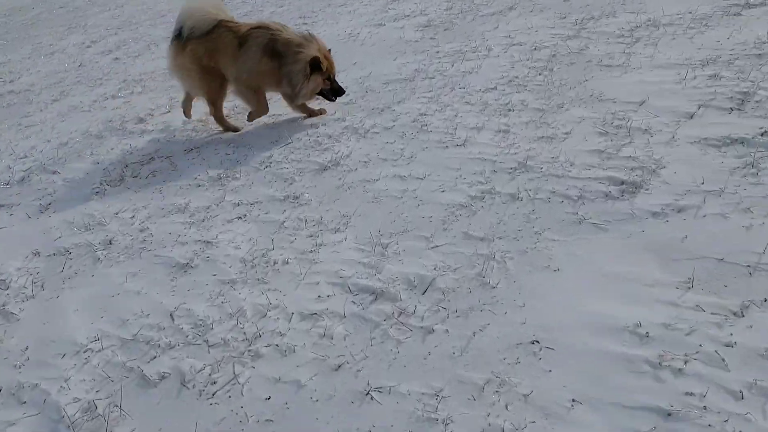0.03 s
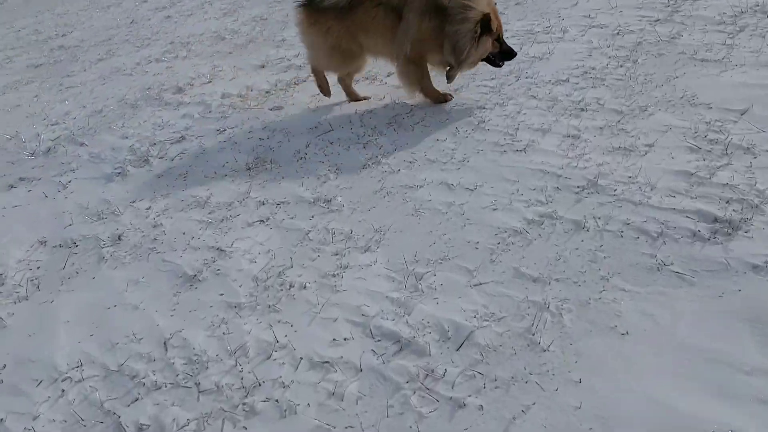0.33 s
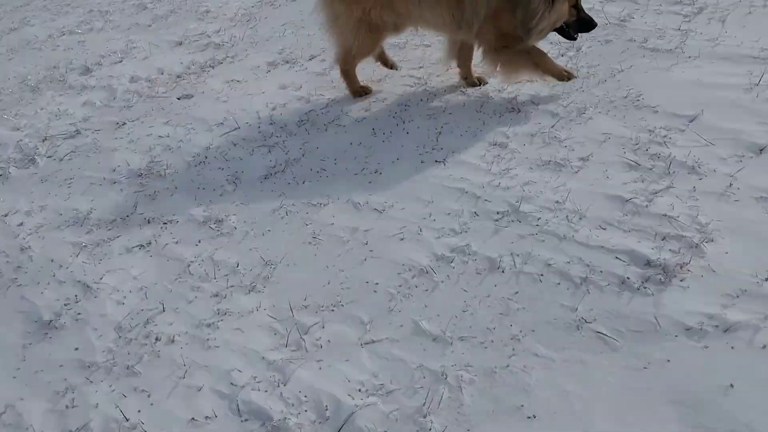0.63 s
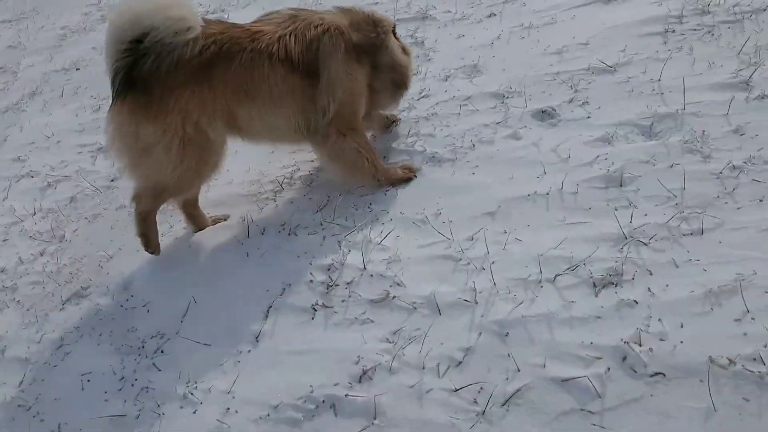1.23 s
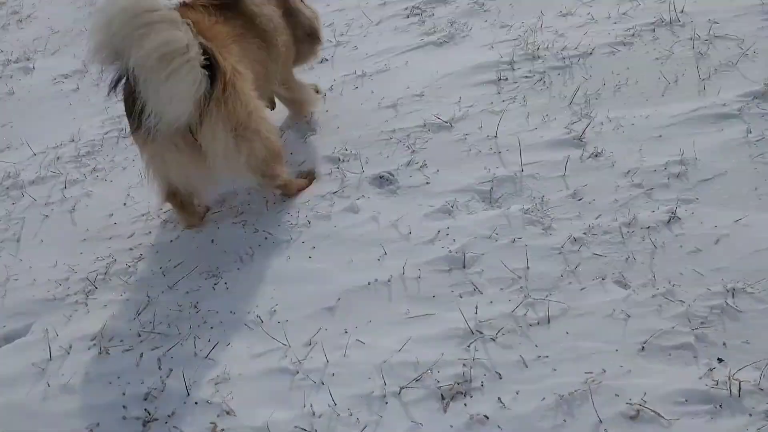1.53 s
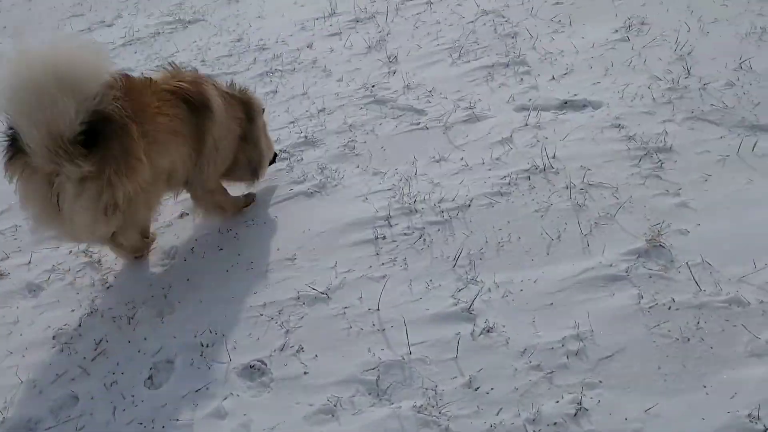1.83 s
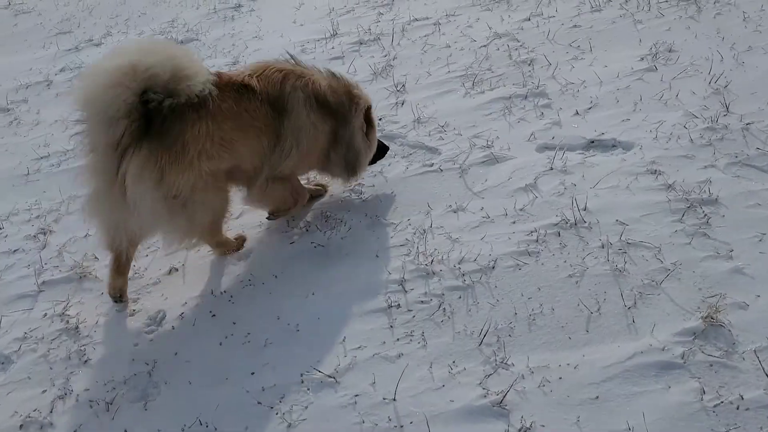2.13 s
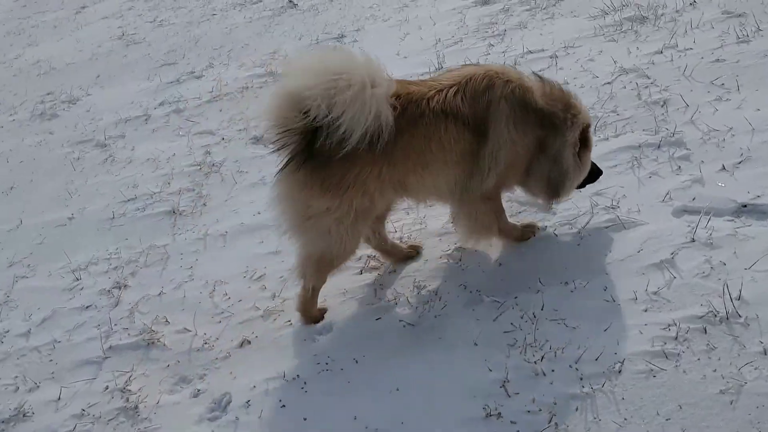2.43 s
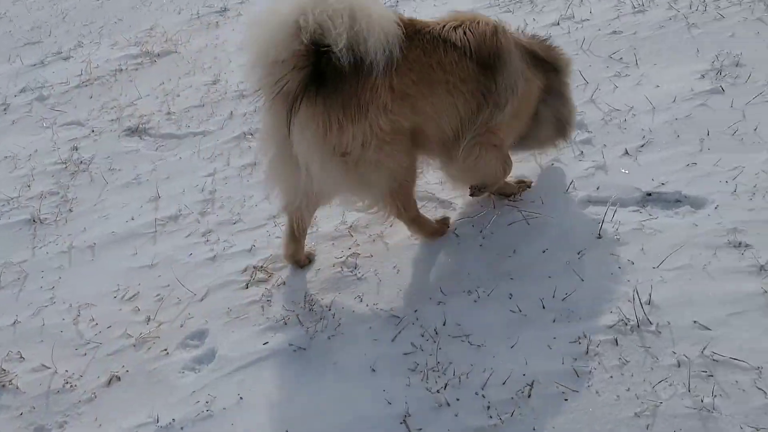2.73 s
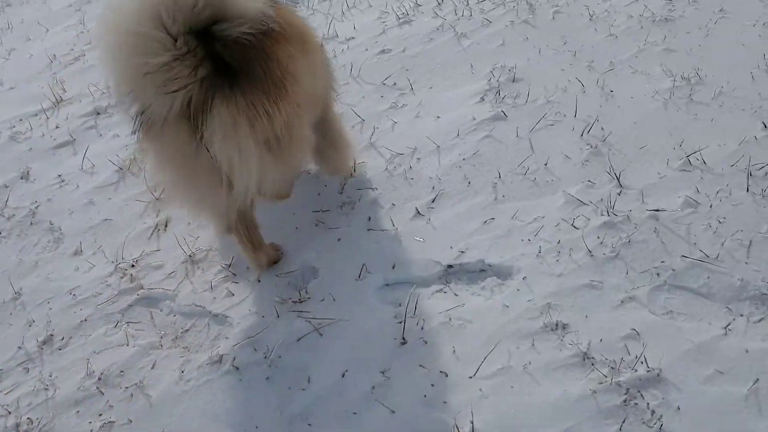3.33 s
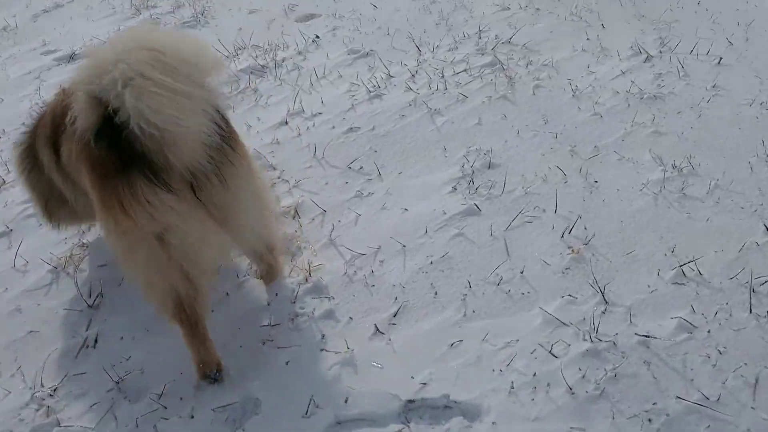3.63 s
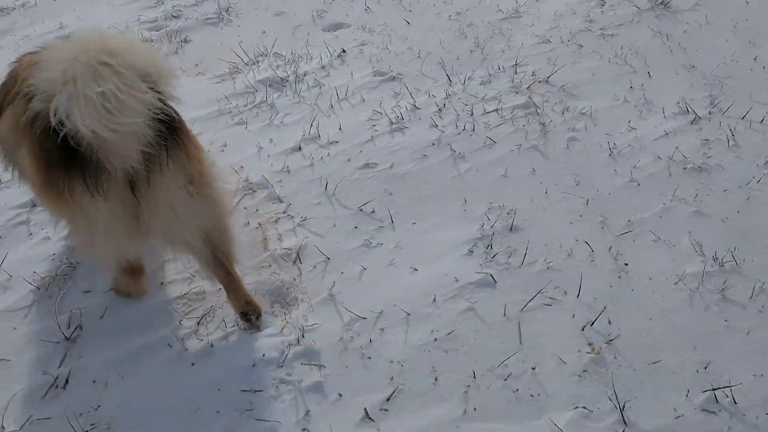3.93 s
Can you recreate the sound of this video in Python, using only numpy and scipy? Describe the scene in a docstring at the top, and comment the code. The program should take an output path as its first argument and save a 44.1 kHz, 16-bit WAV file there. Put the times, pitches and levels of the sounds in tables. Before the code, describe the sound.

Footsteps crunch steadily through thin, dry, crusted snow in an open field. Each close boot step cracks and scuffs the crust, with small hollow knocks and icy ticks, while light wind briefly rumbles on the microphone early on.

```python
"""An open field of thin, dry, crusted snow. Boots walk close by, a step about every 0.6 s.
Each sole crushes and scuffs the crust in runs of tiny fractures. Single plates of crust break with
a hollow knock, and loose ice ticks. Loose grains hiss between the steps, and a light wind
buffets the microphone."""
import sys
import numpy as np
from scipy import signal
from scipy.io import wavfile
from scipy.ndimage import uniform_filter1d

SR = 44100
rng = np.random.default_rng(int(sys.argv[2]) if len(sys.argv) > 2 else 0)


def unload_audio(sound):
    """Save the sound as a 16-bit wav file, at the path given as the first command line argument."""
    columns = np.transpose(np.atleast_2d(sound))
    # keep every value between -1 and 1, then stretch to whole-number steps
    steps = np.round(np.clip(columns, -1, 1) * 32767)
    wavfile.write(sys.argv[1], SR, steps.astype(np.int16))


N = 176400

# Four tone colours of snow. Each row: frequency in Hz, relative level in dB.
PACKING_TONE = [(40, -33), (90, -30), (140, -4.5), (220, 0.5), (400, 3), (520, -7), (800, -26.5),
                (2000, -55)]  # snow pressed down under the crust
CRUNCH_TONE = [(100, -38), (300, -19), (500, 1.5), (750, 0.5), (1100, -3), (1500, -4.5), (2000, -12),
               (2500, -22), (3200, -19), (4200, -26), (6000, -41), (16000, -75.5)]  # the crust breaking
RASP_TONE = [(800, -19.5), (2000, 7), (3100, 1.5), (4200, -3.5), (5500, -0.5), (7500, -17), (16000, -31.5)]  # the sole scuffing
FIZZ_TONE = [(300, -53), (1500, -19), (3000, 7), (4500, 1), (7000, 2.5), (10000, 0), (13000, -2.5),
             (15800, 1)]  # fine ice crystals

CRYSTALS_PER_S, CRYSTAL_SPREAD_DB = 4500, 5


def amp(db):
    """Turns decibels into a number to multiply by."""
    return 10 ** (np.asarray(db) / 20)


def unit(x):
    """Scales a signal to an average power of 1."""
    return x / np.sqrt(np.mean(x ** 2) + 1e-20)


def spectrum_db(points):
    """Joins rows of frequency and dB into a curve for a filter."""
    hz, db = np.transpose(points)
    return np.interp(np.log(np.fft.rfftfreq(4096, 1 / SR) + 1), np.log(hz), db)


def level(points):
    """Joins rows of time and dB into a gain for every sample."""
    return amp(np.interp(np.arange(N) / SR, *np.transpose(points)))


def shape(x, gain):
    """Turns each frequency up or down, with no ringing ahead of a click."""
    log_gain = np.log(np.r_[gain, gain[-2:0:-1]] + 1e-6)
    response = np.exp(np.conj(signal.hilbert(log_gain)))
    taps = np.fft.ifft(response).real[:len(gain)]
    return signal.oaconvolve(np.atleast_2d(x), taps[None], axes=1)[:, :N]


def colour(x, tone):
    """Gives plain noise or clicks a tone colour and keeps their power."""
    return shape(x, unit(amp(spectrum_db(tone))))


def add(mix, start_s, sound):
    """Mixes a sound in at the given time."""
    at = max(round(start_s * SR), 0)
    part = mix[..., at:at + sound.shape[-1]]
    part += sound[..., :part.shape[-1]]


def wander(step_s):
    """A curve that slides to a new random value every step_s seconds."""
    values = rng.standard_normal(4096)
    return np.interp(np.arange(N) / SR / step_s, np.arange(len(values)), values)


def grains(per_s, spread_db):
    """Uneven clicks from random directions. The two rows are mid (centre) and side (left minus right)."""
    size_db = spread_db * np.minimum(rng.exponential(1, N), 3.5)
    clump_db = 3 * wander(step_s=.004)  # fractures come in small avalanches
    happens = rng.random(N) < per_s / SR
    clicks = amp(size_db + clump_db) * happens * rng.choice([-1., 1.], N)
    return np.array([unit(clicks), unit(clicks * rng.standard_normal(N))])


def cut(clicks, start_s, t):
    """Takes a stretch of clicks as long as t, at an average power of 1."""
    return unit(np.take(clicks, round(start_s * SR) + np.arange(len(t)), axis=1, mode="wrap"))


def burst(clicks, start_s, decay_s):
    """A spray of clicks that dies away quickly."""
    t = np.arange(0, 6 * decay_s, 1 / SR)
    fade = np.exp(-t / decay_s)
    return unit(cut(clicks, start_s, t) * fade) * np.sqrt(np.mean(fade ** 2))


def wind():
    """Gusts rumble on the microphone and push left and right in opposite directions."""
    # Strength of the wind. Each row: time in seconds, relative level in dB.
    gusts = [(0, -38), (.2, -30.5), (.37, -40.5), (.5, -24), (.65, -18), (.78, -18.5), (.9, -16.5),
             (1.03, -21), (1.15, -34.5), (1.35, -28.5), (1.6, -31), (1.7, -40), (1.85, -33), (2.1, -47),
             (2.4, -43), (2.7, -33), (3.3, -52), (4, -44)]
    # Tone of the rumble. Each row: frequency in Hz, relative level in dB.
    rumble_tone = [(20, -19), (50, -7), (80, 1), (110, 1.5), (170, 1), (260, -12), (400, -20.5), (700, -40),
                   (1500, -68), (4000, -85)]
    air, stray_air = colour(rng.standard_normal((2, N)), rumble_tone)
    strength = level(gusts) * amp(-3 + wander(step_s=.03))
    return strength * (np.array([air, -amp(-1.5) * air]) + amp(-13.5) * stray_air)


def loose_grains():
    """Loose grains of snow shift and hiss between the steps."""
    # Coarse rustle and fine hiss. Each row: time in seconds, relative level in dB.
    rustle_levels = [(0, -34.5), (.39, -51.5), (.6, -39), (1.05, -56), (1.4, -45), (1.49, -49), (1.7, -35),
                     (1.845, -50.5), (1.98, -48.5), (2.12, -50), (2.3, -44), (2.6, -46), (2.8, -45),
                     (3.1, -41), (3.46, -48), (3.7, -41), (3.81, -55), (4, -48)]
    hiss_levels = [(0, -41), (.27, -48), (.39, -57.5), (.51, -53), (.6, -40.5), (.76, -50), (1.2, -47),
                   (1.49, -50), (1.7, -40), (1.845, -58), (2.12, -55.5), (2.3, -43.5), (2.42, -40.5),
                   (2.56, -46), (3.2, -42), (3.46, -48.5), (3.7, -45), (3.81, -59), (4, -48.5)]
    coarse = grains(per_s=2600, spread_db=3) * level(rustle_levels)
    fine = grains(per_s=14000, spread_db=4) * level(hiss_levels)
    rustle = amp(2) * colour(coarse, CRUNCH_TONE) + amp(-3.5) * colour(coarse, PACKING_TONE)
    return rustle + amp(1) * colour(fine, FIZZ_TONE)


def ice_ticks():
    """Thin ice snaps with a bright tick and a lower click."""
    # Each row is one snap: start in seconds, then relative levels in dB of the tick and the click.
    snaps = [(.088, -17, -22), (.196, -57, -42), (.265, -33, -35), (0.624, -28, -25), (.729, -34.5, -50),
             (0.792, -35, -28), (.803, -23, -22.5), (0.833, -37, -43), (0.907, -39, -47), (0.919, -24, -32),
             (0.947, -22.5, -24), (.965, -28, -36), (1.028, -34, -23), (1.038, -23, -14.5),
             (1.302, -29.5, -37), (1.413, -34, -34), (1.44, -31, -40), (1.451, -24.5, -27.5),
             (1.529, -30, -27), (1.559, -28, -28), (1.606, -27, -32), (1.619, -24.5, -17.5),
             (1.634, -23.5, -39), (1.647, -27.5, -26.5), (1.692, -28, -34), (1.865, -23, -26),
             (1.992, -32, -52), (2.047, -32, -24), (2.062, -29, -27), (2.094, -30.5, -36), (2.1, -30, -47),
             (2.221, -32.5, -32.5), (2.322, -27, -32), (2.526, -26, -36), (2.73, -29.5, -53),
             (2.76, -27, -35), (2.77, -23, -21), (2.776, -21, -20.5), (2.79, -29, -37), (2.829, -28.5, -30),
             (2.858, -18.5, -18), (2.944, -25.5, -26), (3.066, -55, -55), (3.133, -29.5, -45),
             (3.162, -28, -36), (3.181, -26.5, -42), (3.399, -29, -52), (3.599, -32, -34),
             (3.789, -34.5, -49), (3.968, -37.5, -48)]
    # Tones of the tick and the click. Each row: frequency in Hz, relative level in dB.
    tick_tone = [(300, -21), (1000, 15), (2000, -4), (3200, 4), (5500, 8), (8000, 3.5), (10000, 7.5),
                 (13000, 0.5), (15800, 0.5)]
    click_tone = [(200, -20), (600, 3), (1300, 1.5), (2200, -12), (3200, -3), (4500, -11), (7000, -18),
                  (16000, -39)]
    crystals = grains(CRYSTALS_PER_S, CRYSTAL_SPREAD_DB)
    ticks, clicks = np.zeros((2, 2, N))
    for start, tick_db, click_db in snaps:
        add(ticks, start, amp(tick_db + 4) * burst(crystals, start, decay_s=.0013))
        add(clicks, start, amp(click_db + 1.5) * burst(crystals, start, decay_s=.0015))
    return colour(ticks, tick_tone) + colour(clicks, click_tone)


def knock(hz, rise_cycles, phase, place):
    """A plate of crust flexes a few times on the soft snow. Place runs from 0 (right) to 1 (left)."""
    t = np.arange(0, .03, 1 / SR)
    age = t * hz / max(rise_cycles, .2)
    flex = age * np.exp(1 - age) * np.sin(2 * np.pi * (hz * t + phase))
    return np.outer([1, 2 * place - 1], flex)


def breaking_plates():
    """A plate of crust gives way: a dull knock, a weaker second break, crumbs and splinters."""
    # Each row is one plate: start in seconds, relative knock level in dB, pitch in Hz,
    # cycles until the knock peaks (more rings longer), relative splinter level in dB.
    plates = [(0.0017, -9.5, 1040, 0.76, -38), (0.019, -13, 740, 0.77, -46), (0.0315, -8, 780, 0.96, -43),
              (0.0363, -2.5, 1110, 0.29, -51), (0.0695, -4, 730, 0.16, -27),
              (0.0772, -2.5, 364, 0.29, -23.5), (0.1136, -3.5, 695, 0.24, -31),
              (0.1582, -9.5, 950, 0.26, -49), (0.287, -9, 420, 0.4, -27), (0.3365, -17.5, 870, 0.43, -32),
              (0.4279, -17, 665, 0.32, -49), (0.456, -20.5, 464, 0.3, -49), (0.6056, -9.5, 473, 0.59, -48),
              (0.6225, -8, 770, 0.35, -33), (0.6286, -19, 655, 0.45, -29), (0.831, -7, 636, 0.22, -47),
              (0.921, -13, 400, 0.33, -34), (0.954, -10.5, 296, 0.19, -43), (1.001, -22, 600, 0.77, -42),
              (1.0356, -4, 650, 0.45, -48), (1.0428, -4.5, 595, 0.66, -23),
              (1.0979, -3.5, 434, 0.31, -23.5), (1.1146, -28, 577, 0.28, -42), (1.1264, -9, 890, 0.63, -42),
              (1.146, -13, 706, 0.31, -36), (1.176, -9, 810, 0.4, -57), (1.3716, -16, 910, 0.51, -53),
              (1.5467, -17, 1170, 0.34, -29.5), (1.5897, -17, 1110, 0.51, -31),
              (1.6278, -12.5, 806, 0.32, -32), (1.731, -1, 516, 0.33, -28), (1.7412, -5.5, 490, 0.38, -48),
              (1.7478, -12, 460, 0.44, -44), (1.769, -11, 660, 0.32, -36), (1.8115, -11.5, 514, 0.38, -30),
              (1.8664, -13, 650, 0.86, -38), (1.8715, -22, 560, 0.2, -44), (1.99, -19.5, 487, 0.18, -32.5),
              (2.047, -8.5, 460, 0.4, -24.5), (2.0773, -6.5, 1020, 0.51, -28.5),
              (2.1559, -3.5, 880, 0.4, -32), (2.1605, -20, 517, 0.56, -53), (2.2439, -12, 760, 0.31, -34),
              (2.325, -16, 696, 0.66, -30), (2.3437, -5, 443, 0.25, -18.5), (2.3551, -15, 390, 0.23, -27.5),
              (2.3789, -6, 930, 0.25, -36), (2.3978, -7.5, 445, 0.31, -50), (2.5348, -15, 560, 0.31, -46),
              (2.7895, -14.5, 1070, 0.47, -50), (2.8518, -9, 660, 0.32, -26), (2.8741, -7, 615, 0.75, -44),
              (2.9049, -4.5, 484, 0.83, -24), (2.9123, -7.5, 574, 0.13, -47), (2.9489, -8, 724, 0.2, -24),
              (2.9544, -7.5, 706, 0.34, -31), (2.9749, 0, 820, 0.18, -49), (2.9792, -21, 500, 0.65, -46),
              (2.9855, -20, 700, 0.33, -45), (3.004, -23, 298, 0.8, -41), (3.033, -22, 450, 0.67, -36),
              (3.1488, -15, 770, 0.34, -41), (3.1757, -7.5, 975, 0.23, -32), (3.2033, -15, 464, 0.39, -37),
              (3.2077, -13, 480, 0.36, -39), (3.2799, -13.5, 308, 0.25, -26), (3.4063, -12, 754, 0.18, -40),
              (3.4133, -24, 470, 0.4, -37), (3.4975, -14, 824, 0.36, -41), (3.5106, -2.5, 564, 0.38, -29.5),
              (3.5152, -13, 367, 1, -48), (3.5217, -6.5, 440, 0.71, -40), (3.526, -11, 610, 0.55, -45),
              (3.536, -15, 446, 0.56, -46), (3.5844, -7.5, 1040, 0.98, -41), (3.5897, -17, 1070, 0.6, -41),
              (3.5975, -10, 410, 0.42, -42), (3.6145, -9, 880, 0.4, -32), (3.6207, -8.5, 965, 1, -36),
              (3.6268, -2.5, 710, 0.5, -36), (3.655, -20, 746, 0.4, -45), (3.688, -16, 795, 0.3, -31),
              (3.7258, -2, 437, 0.29, -35), (3.7315, -12, 430, 0.4, -30), (3.7707, -18, 486, 0.61, -32),
              (3.832, -13.5, 820, 0.13, -40), (3.8416, -15.5, 287, 0.84, -29),
              (3.9146, -18.5, 483, 0.26, -37.5)]
    crystals = grains(CRYSTALS_PER_S, CRYSTAL_SPREAD_DB)
    knocks, crumbs, splinters = np.zeros((3, 2, N))
    for start, db, hz, rise_cycles, splinter_db in plates:
        phase, place, wait, detune = rng.random(4)
        add(knocks, start, amp(db - .5) * knock(hz, rise_cycles, phase, place))
        second_start = start + .00459 * (.5 + wait)
        second_hz = hz * 2 ** (.74 * (detune - .5))
        add(knocks, second_start, amp(db - 8.5) * knock(second_hz, rise_cycles, wait, place))
        add(crumbs, start, amp(db - 12) * burst(crystals, start, decay_s=.0027))
        add(splinters, start - .001, amp(splinter_db + 3.5) * burst(crystals, start, decay_s=.0022))
    knocks = signal.sosfilt(signal.butter(2, 118, "high", fs=SR, output="sos"), knocks)
    spray = colour(splinters, FIZZ_TONE) + amp(-5.5) * colour(splinters, RASP_TONE)
    return knocks + colour(crumbs, CRUNCH_TONE) + spray


def crushing_soles():
    """The sole breaks the crust grain by grain, packs the snow below, rasps and sheds crystals."""
    # Each row is one press or scuff: start and length in seconds, then relative levels in dB
    # of the packing, the crunch, the rasp and the fizz.
    presses = [(0.016, 0.048, -47, -21, -33.5, -50), (0.066, 0.036, -26.5, -21, -26.5, -53),
               (0.107, 0.017, -26.5, -25, -39, -59), (0.157, 0.058, -36, -28, -37, -40.5),
               (0.229, 0.019, -44, -35.5, -38, -53), (0.275, 0.018, -33, -24, -37, -59),
               (0.313, 0.04, -40.5, -38.5, -49, -47), (0.424, 0.039, -48, -37.5, -54, -53),
               (0.53, 0.061, -28.5, -23.5, -40, -44.5), (0.598, 0.047, -31, -27.5, -40, -50),
               (0.648, 0.072, -32, -32.5, -42.5, -44.5), (0.778, 0.11, -38.5, -42, -42, -42.5),
               (0.9, 0.076, -45, -37, -37, -36.5), (0.994, 0.09, -35.5, -37, -44, -48.5),
               (1.089, 0.057, -28, -22, -36.5, -38), (1.154, 0.032, -51, -39.5, -61, -48),
               (1.194, 0.12, -43.5, -38.5, -45.5, -51), (1.3, 0.14, -44.5, -39.5, -41, -46),
               (1.542, 0.029, -42, -30.5, -39, -38.5), (1.587, 0.12, -43.5, -34, -41.5, -44),
               (1.699, 0.091, -27, -25.5, -38, -37), (1.8, 0.022, -39, -31, -48, -42),
               (1.856, 0.017, -21.5, -21.5, -37, -36), (1.905, 0.033, -42.5, -38, -45.5, -54),
               (1.963, 0.068, -40.5, -40.5, -42, -45.5), (2.043, 0.019, -27.5, -28.5, -38, -44),
               (2.072, 0.02, -55, -52, -47, -59), (2.144, 0.019, -25, -30, -53, -44),
               (2.2, 0.086, -45.5, -46.5, -46, -57), (2.315, 0.089, -23.5, -24, -32.5, -37),
               (2.413, 0.057, -39.5, -40, -47, -48), (2.507, 0.035, -44, -37.5, -51, -44.5),
               (2.729, 0.077, -55, -49, -40, -42.5), (2.822, 0.049, -38, -35, -33.5, -36.5),
               (2.864, 0.068, -29.5, -21, -48, -42.5), (2.94, 0.071, -22.5, -25.5, -40, -37.5),
               (3.019, 0.084, -35.5, -37.5, -49, -46.5), (3.134, 0.089, -46, -32, -38.5, -43.5),
               (3.244, 0.06, -38, -35.5, -39.5, -41), (3.298, 0.18, -41, -41, -59, -54.5),
               (3.494, 0.041, -47, -31, -44, -42), (3.554, 0.044, -36, -28.5, -39.5, -49),
               (3.588, 0.042, -22, -21.5, -34.5, -37.5), (3.63, 0.071, -28.5, -26, -36.5, -38.5),
               (3.721, 0.016, -24.5, -24, -37, -37), (3.759, 0.018, -24, -25, -37, -42),
               (3.83, 0.023, -30.5, -31, -38.5, -40.5), (3.855, 0.024, -44, -43, -58, -53)]
    attack_s, release_s, sag_db = .0041, .0044, 2.5
    fractures = grains(per_s=1200, spread_db=4.5)
    fractures = 16 * np.tanh(fractures / 16)  # softens the biggest clicks
    crystals = grains(CRYSTALS_PER_S, CRYSTAL_SPREAD_DB)
    packing, crunch, rasp, fizz = np.zeros((4, 2, N))
    for start, length, packing_db, crunch_db, rasp_db, fizz_db in presses:
        t = np.arange(0, length + 4 * release_s, 1 / SR)
        rise = np.minimum(t / attack_s, 1)
        release = np.exp(-np.maximum(t - length, 0) / release_s)
        load = rise * release * amp(sag_db * (.5 - t / length))
        breaking = cut(fractures, start, t) * load
        shedding = cut(crystals, start, t) * load
        add(packing, start, amp(packing_db - .5) * breaking)
        add(crunch, start, amp(crunch_db) * breaking)
        add(rasp, start, amp(rasp_db - .5) * (.8 * breaking + .65 * shedding))
        add(fizz, start, amp(fizz_db + 1) * (.14 * breaking + 1.18 * shedding))
    return (colour(packing, PACKING_TONE) + colour(crunch, CRUNCH_TONE)
            + colour(rasp, RASP_TONE) + colour(fizz, FIZZ_TONE))


def flake_glints(x):
    """Every flake of crust rings with a tone of its own, so the treble glints and shifts."""
    # How much the flakes vary. Each row: frequency in Hz, typical swing in dB.
    flake_spread = [(100, 0), (1500, 3.5), (3000, 1.5), (6000, 2.5), (16000, 2.5)]
    hz, _, slices = signal.stft(x, SR, nperseg=256, noverlap=192)
    patches = rng.standard_normal(slices.shape[:0:-1]).T
    for _ in range(2):
        patches = uniform_filter1d(patches, size=8, axis=0)  # blur across pitch
        patches = uniform_filter1d(patches, size=9, axis=1)  # blur across time
    spread_db = np.interp(hz, *np.transpose(flake_spread))[:, None]
    gain = amp(spread_db * unit(patches))
    gain /= np.sqrt(np.mean(gain ** 2, axis=1, keepdims=True))
    return signal.istft(slices * gain, SR, nperseg=256, noverlap=192)[1][:, :N]


def ground_scatter(x):
    """Adds a faint, short bounce off the ground and the walker; the open field has no echo."""
    decay_s, bounce_db = .02, -22
    t = np.arange(0, .08, 1 / SR)
    tail = rng.standard_normal((2, len(t))) * np.exp(-t / decay_s) * (t > .002)
    tail /= np.linalg.norm(tail[0])
    return x + amp(bounce_db) * signal.oaconvolve(x, tail, axes=1)[:, :N]


def scene():
    """Spreads the snow sounds between left and right and adds the wind."""
    # Stereo width. Each row: frequency in Hz, side minus mid in dB.
    stereo_width = [(100, -2.5), (250, -14.5), (500, -11.5), (1000, -17.5), (1500, -4), (2200, 12),
                    (3100, -11), (4400, 10.5), (5400, -6), (6400, 4), (8000, 0), (10000, 0), (16000, 2)]
    # Stereo balance. Each row: frequency in Hz, left minus right in dB.
    stereo_balance = [(100, 4), (300, -3), (600, -1.7), (1200, -0.5), (2200, -3.5), (3200, -1.5),
                      (5000, -0.5), (9000, -1), (13000, -3), (16000, -4)]
    crust = flake_glints(crushing_soles() + breaking_plates() + loose_grains())
    snow = ground_scatter(crust + ice_ticks())
    width = amp(spectrum_db(stereo_width))
    lean = amp(spectrum_db(stereo_balance) / 2)
    mid = shape(snow[0], 1 / np.hypot(1, width))
    side = shape(snow[1], width / np.hypot(1, width))
    left, right = shape(mid + side, lean), shape(mid - side, 1 / lean)
    return np.vstack([left, right]) + wind()


def record(dry):
    """Clips peaks at full scale and removes the very highest treble."""
    cutoff_hz = 15900
    low_pass = signal.firwin(511, cutoff_hz, window=("kaiser", 9), fs=SR)
    return signal.oaconvolve(np.clip(dry, -1, 1), low_pass[None], "same")


dry = scene()
out = record(dry)
unload_audio(out)
```